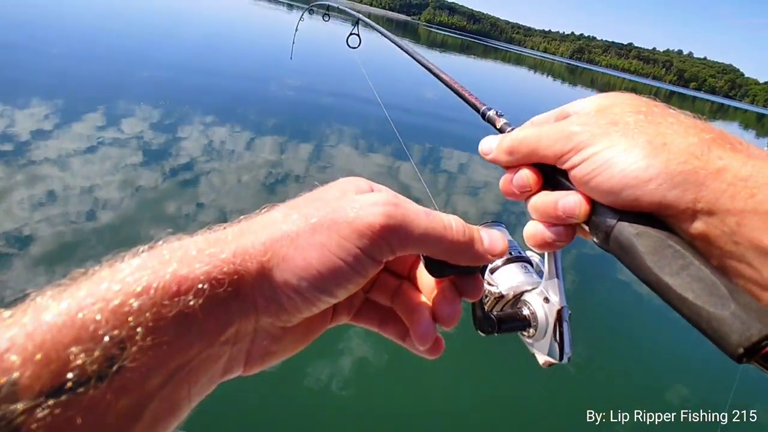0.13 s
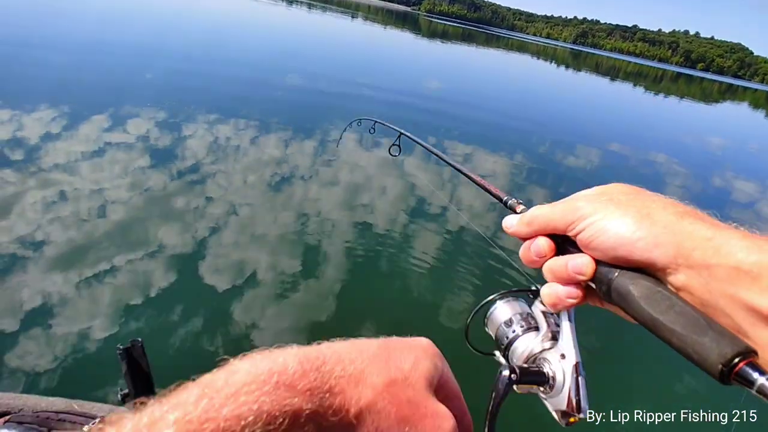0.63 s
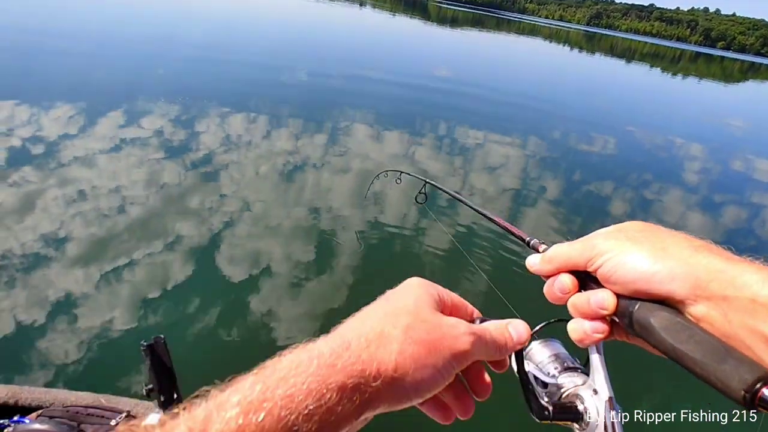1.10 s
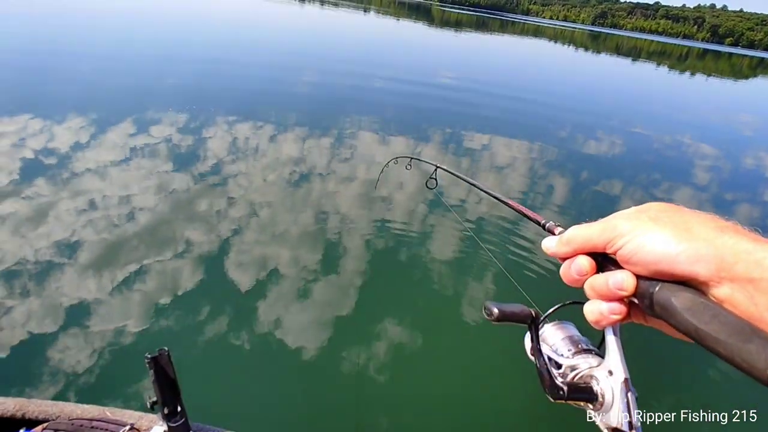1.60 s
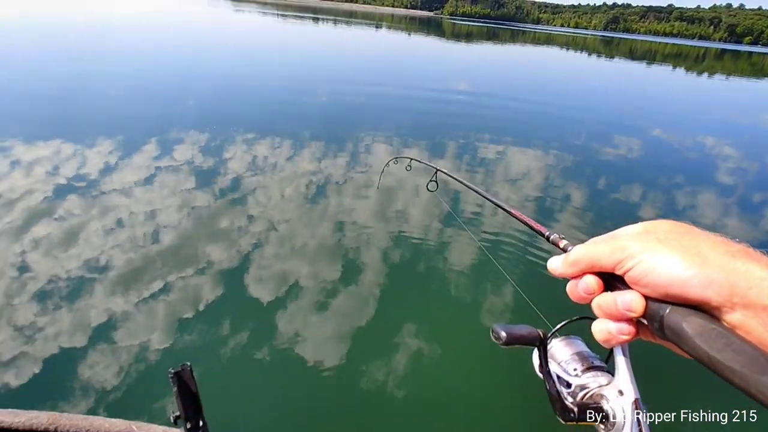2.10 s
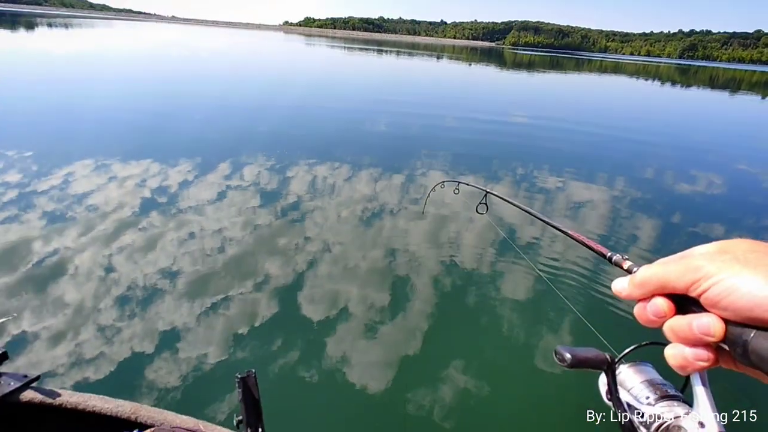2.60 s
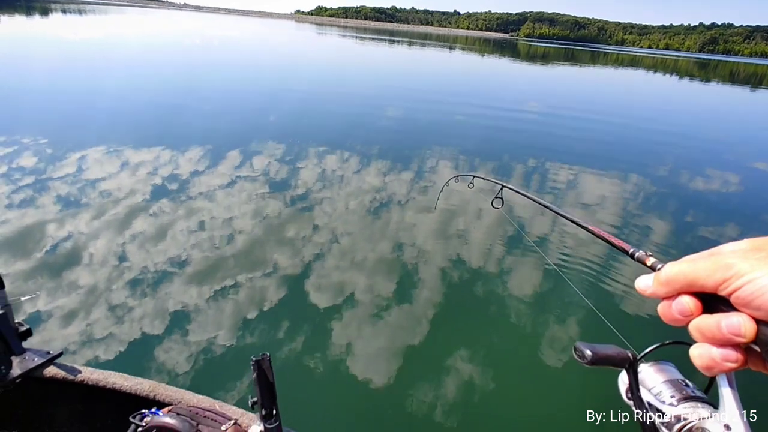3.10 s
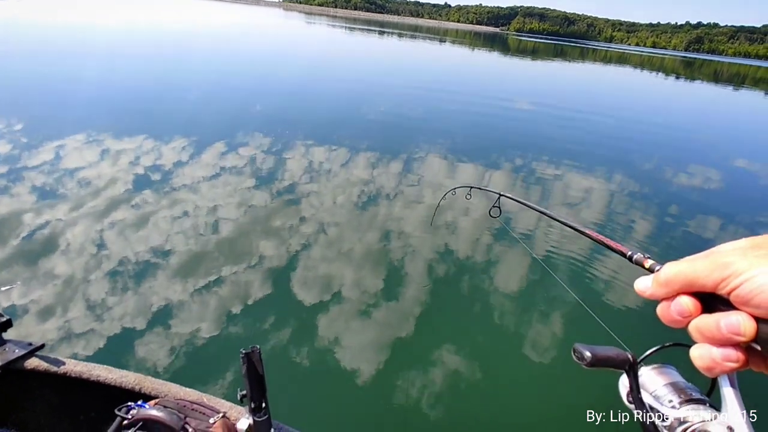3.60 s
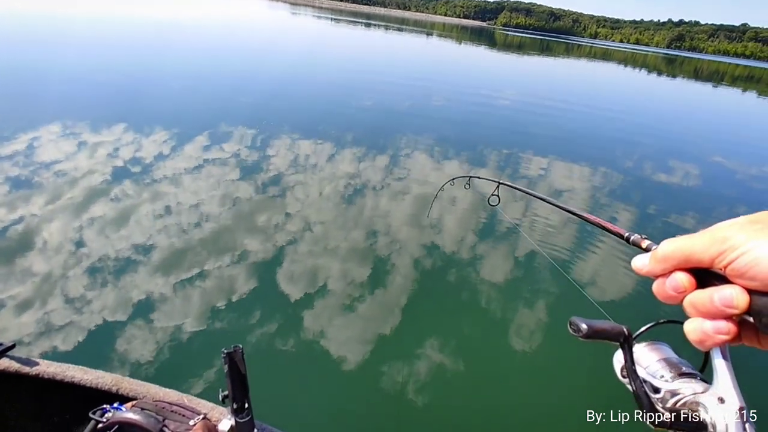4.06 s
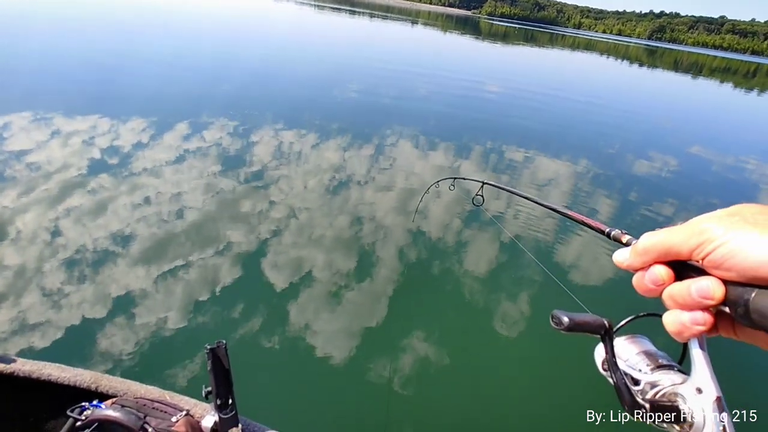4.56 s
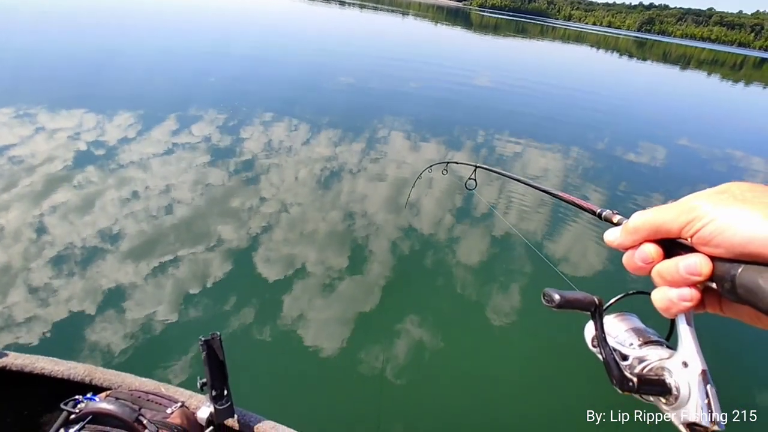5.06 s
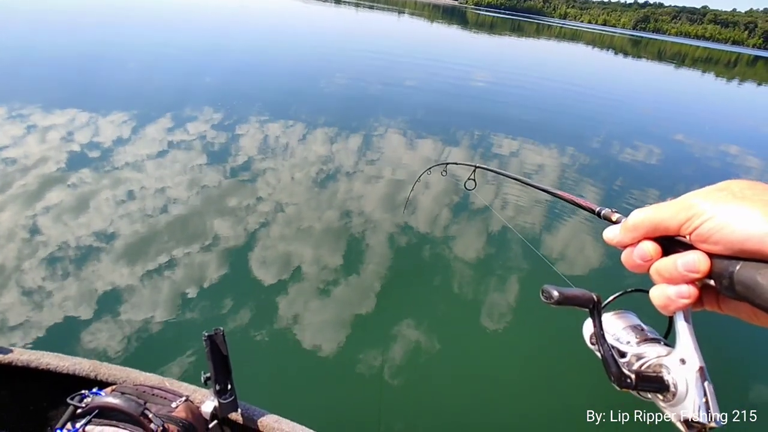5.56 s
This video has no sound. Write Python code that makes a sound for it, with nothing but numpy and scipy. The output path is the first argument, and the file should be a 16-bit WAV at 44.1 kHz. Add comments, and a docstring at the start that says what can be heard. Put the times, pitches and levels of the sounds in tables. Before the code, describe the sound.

Close, stereo outdoor sound on a small boat: a dry, bright reel ratchet dominates, leaning mostly to the right. It begins shortly after the start, rattles quickly, eases to separate clicks around two seconds, then picks up again and varies to the end. Some clicks have a dull low knock and a faint metal ring. Behind are steady quiet ticks, hand and water rustle, lake hush and light wind rumble on the microphone.

```python
"""A small boat on a calm lake: a fish strips line off a spinning reel held close to the microphone.
A sprung pawl snaps over the teeth of the drag: ringing modes, a noisy crack, at times a dull low pulse.
The snaps also make the metal spool ring, and they follow the pull of the fish.
The hull gives soft decaying ticks about thirty times a second; a narrow band of noise swishes briefly.
Behind lie shaped noise for wind, hands and water and the lake's hush, and low puffs at the ports."""
import sys
import numpy as np
from scipy import signal
from scipy.fft import rfft, irfft
from scipy.io import wavfile

SR = 44100
rng = np.random.default_rng(int(sys.argv[2]) if len(sys.argv) > 2 else 0)


def undo_db(level):
    """Turn decibels back into plain size, where 20 dB means ten times bigger."""
    steps = np.asarray(level, float) / 20
    return 10 ** steps


def unload_audio(sound):
    """Save the sound as a 16-bit wav file, at the path given as the first command line argument."""
    columns = np.transpose(np.atleast_2d(sound))
    # keep every value between -1 and 1, then stretch to whole-number steps
    steps = np.round(np.clip(columns, -1, 1) * 32767)
    wavfile.write(sys.argv[1], SR, steps.astype(np.int16))


N = 250488


def rms_one(x):
    """Scale to an rms of 1."""
    return x / np.sqrt(np.mean(x ** 2) + 1e-20)


def sides(pan_db):
    """Gains of the left and right port for a left-right difference in dB; positive is left."""
    return undo_db(np.array([[.5], [-.5]]) * pan_db)


def left_late(x, lag_s):
    """Sound reaches the left port lag_s later than the right."""
    t = np.arange(N)
    return np.array([np.interp(t - lag_s * SR, t, x[0]), x[1]])


def train(s, sizes):
    """Impulses of the given sizes (channels x events) at times s."""
    out = np.zeros((2, N))
    at = np.round(s * SR).astype(int)
    inside = (at >= 0) & (at < N)
    out[:, at[inside]] = sizes[:, inside]
    return out


def ring(clicks, hz, t60):
    """A two-pole resonance struck by clicks; it falls 60 dB in t60 seconds."""
    r = undo_db(-60 / (t60 * SR))
    w = 2 * np.pi * hz / SR
    return signal.lfilter([0, np.sin(w)], [1, -2 * r * np.cos(w), r * r], clicks + 1e-18)


def fade(x, t60):
    """Exponential decay after each impulse, 60 dB in t60 seconds."""
    return signal.lfilter([1], [1, -undo_db(-60 / (t60 * SR))], x + 1e-18)


def swell(s, sizes, rise_t60, fall_t60):
    """An envelope that climbs exponentially to each moment and dies after it."""
    blows = train(s, sizes)
    rise = fade(blows[:, ::-1], rise_t60)[:, ::-1]
    return fade(blows, fall_t60) + rise - blows   # the peak is in both halves


def bell(s, length_s):
    """A smooth rise and fall about time s; length_s is its standard deviation."""
    return np.exp(-.5 * ((np.arange(N) / SR - s) / length_s) ** 2)


def band_pass(x, low_hz, high_hz):
    """Keep one band of frequencies."""
    return signal.sosfilt(signal.butter(2, [low_hz, high_hz], "band", fs=SR, output="sos"), x)


def colour(x, spectrum):
    """Shape by a spectrum in dB per Hz, with the causal (minimum) phase; white noise keeps its rms."""
    size = 1024
    hz, db = np.transpose(spectrum)
    gain = undo_db(np.interp(np.log(np.arange(size + 1) * SR / 2 / size + 1), np.log(hz), db))
    cepstrum = irfft(np.log(gain))
    # folding the cepstrum onto positive time gives minimum phase
    cepstrum[1:size] *= 2
    cepstrum[size + 1:] = 0
    response = irfft(np.exp(rfft(cepstrum)))
    response = response / np.sqrt(np.sum(response ** 2))
    return signal.oaconvolve(x, response[None], axes=1)[:, :N]


def drift(rate_hz):
    """Slow chance for each channel, spread 1: noise through two equal low-pass poles."""
    r = np.exp(-2 * np.pi * rate_hz / SR)
    slow = signal.lfilter([1], [1, -2 * r, r * r], rng.standard_normal((2, N + SR)))
    return rms_one(slow)[:, SR:]


def in_time(rows):
    """Straight lines through the rows' columns, the first being seconds."""
    s, *columns = np.transpose(rows)
    return [np.interp(np.arange(N) / SR, s, c) for c in columns]


def moments(s, counted):
    """Times of every whole count, on a smooth cubic path through the given ones."""
    counted = np.round(counted)
    number = np.arange(counted[0], counted[-1] + 1)
    slope = np.gradient(s, counted)
    i = np.minimum(np.searchsorted(counted, number, "right") - 1, len(s) - 2)
    h = counted[i + 1] - counted[i]
    u = (number - counted[i]) / h
    bend = h * u * (1 - u) * (slope[i] * (1 - u) - slope[i + 1] * u)
    return number.astype(int), s[i] + (s[i + 1] - s[i]) * u * u * (1 + 2 * (1 - u)) + bend


# The drag wheel, tooth by tooth round one turn. Each row: relative levels in dB of the snap, its brightness,
# the reel frame, the reel body and the spool ring near 12 kHz.
WHEEL_TEETH = [(-24, 0.1, -45.5, -40.5, -26), (-23, 0, -48.5, -39, -28), (-24.5, -1.2, -34.5, -42, -23),
               (-25.5, 1, -36, -42.5, -32), (-27.5, 0.2, -36.5, -36.5, -36), (-29, -1.5, -36.5, -34.5, -19),
               (-26.5, -5.5, -33, -33, -36), (-23, -3.5, -32.5, -34.5, -27), (-22, -0.5, -36.0, -33, -29),
               (-21, -1.1, -32, -33.5, -24), (-23, 1, -34, -42.5, -51), (-24.5, -1.3, -37.5, -37.4, -37),
               (-24, 1, -37, -36.5, -58), (-24.5, -0.8, -36, -42.5, -27.2), (-24.5, 1.5, -37.5, -36.0, -27),
               (-25, -1.5, -42, -34, -25), (-25.5, -1, -43, -32.5, -29), (-28, -7, -49, -33.5, -16),
               (-25.5, -3.5, -41, -35.5, -26), (-24.5, -4.5, -44.5, -35, -22),
               (-24, 0.3, -39, -41.5, -30.5), (-24, -1.8, -42, -48.5, -10)]
# How the reel is held. Each row: time in seconds, then load on the pawl, brightness,
# freedom of the frame to shake and left-right difference, all in dB.
REEL_GRIP = [(0, -31, -10, -2, -12), (.3, -3, -5, 13, 1), (0.451, -2, 0, 0, -4.5), (.6, 1.5, -2, 9.5, -1.5),
             (.8, -3, -3.5, -5.5, -9), (1.0, 2.5, -2.5, -8.5, -5), (1.15, 0.5, 2.5, 0, 2),
             (1.5, 0, .5, -0.5, -6.5), (2.2, -1, 4.5, -1, -7.5), (2.8, -2.5, 3, 3, -10.5),
             (3.3, -0.5, 3, 2, -7.5), (3.7, .5, 4, -1.5, -6), (4.1, -0.5, 3, -5, -8.5),
             (4.4, -0.5, 3, -2.5, -7), (4.7, 1, 2.5, 0, -5), (5.05, .5, 4, -8.5, -7),
             (5.35, 1, 2, -4.5, -4.5), (5.68, 2.5, 4, -3, -4.5)]
# Running numbers of the teeth whose passing times are given, one for each row of the next table.
TIMED_TEETH = [-1, 0, 1, 2, 5, 7, 9, 11, 14, 21, 26, 33, 39, 44, 48, 51, *range(53, 57),
               58, 60, *range(62, 82),
               84, 87, 90, 95, 100, 103, 108, 110, 112, 113, 114, 120, 125, 132, 145, 147, 151, 153, 155, 157, 164, 168, 175, 181, 189, 194]
# The pull of the fish. Each row: time in seconds when that tooth passes, relative level of the rim's ring in dB.
LINE_PULL = [(0.0, -46.5), (0.3122, -44), (0.3442, -48), (0.3642, -41), (0.418, -42.5), (0.4616, -47),
             (0.5039, -38.5), (0.557, -39), (0.632, -46), (0.7541, -53), (0.8146, -46), (0.8845, -49),
             (0.9348, -41), (0.98, -45), (1.0158, -44), (1.0471, -48), (1.0795, -45), (1.1085, -46.5),
             (1.151, -68), (1.1968, -58), (1.2791, -48.5), (1.3542, -59), (1.4305, -57), (1.4766, -51),
             (1.5256, -50), (1.5854, -49), (1.6468, -47), (1.726, -50.5), (1.8354, -50.5), (1.9673, -61),
             (2.1246, -57), (2.2461, -46.5), (2.3435, -48), (2.4349, -44), (2.5288, -45), (2.642, -47.5),
             (2.7689, -39.5), (2.9387, -44), (3.1097, -47), (3.2046, -44.5), (3.2554, -52.0), (3.2945, -50),
             (3.391, -48.5), (3.4784, -53), (3.5621, -49), (3.6857, -50.5), (3.7983, -45.5),
             (3.8679, -48.5), (4.0116, -49.5), (4.0852, -45), (4.1551, -50.0), (4.1793, -56), (4.2062, -56),
             (4.3521, -43), (4.45, -46.5), (4.57, -50), (4.8226, -55.5), (4.8641, -56), (4.9668, -44),
             (5.028, -52), (5.088, -44), (5.1375, -54.5), (5.2803, -50), (5.3388, -48), (5.4301, -41),
             (5.5051, -50), (5.6111, -57), (5.6724, -45)]


def snaps():
    """Each click: its time, the levels in dB set by tooth, load and speed, and the gains of the two ports."""
    when, rim_db = np.transpose(LINE_PULL)
    number, s = moments(when, TIMED_TEETH)
    snap_db, bright_db, frame_db, body_db, high_db = np.transpose(WHEEL_TEETH)[:, number % len(WHEEL_TEETH)]
    held, *grip = np.transpose(REEL_GRIP)
    load_db, grip_bright_db, free_db, pan_db = (np.interp(s, held, c) for c in grip)
    octaves = -np.log2(np.gradient(s) * 40)   # speed against 40 clicks per second
    # a faster spool shakes frame, body and ring harder: 3, 1.16 and 6.5 dB per octave
    return {"s": s,
            "snap_db": snap_db + load_db,
            "bright_db": bright_db + grip_bright_db,
            "frame_db": frame_db + free_db + 3 * octaves,
            "body_db": body_db + load_db + 0.7 * free_db + 1.16 * octaves,
            "high_db": high_db + load_db + 6.5 * octaves,
            "rim_db": np.interp(s, when, rim_db),
            "pan": sides(pan_db)}


FRAME_TOP_HZ, BODY_TOP_HZ = 3000, 4500   # modes below these follow the frame, then the body
# Short modes of the reel. Each row: frequency in Hz, relative level in dB, decay by 60 dB in seconds.
REEL_MODES = [(2338, -4, 0.053), (2440, -2, 0.034), (2547, -7.5, 0.051), (2770, -2, 0.025),
              (3500, 7, 0.0086), (4040, -4.5, 0.0041), (4496, -2.5, 0.0044), (5560, -12, 0.022),
              (5920, -17.5, 0.024), (6950, -12.5, 0.019), (7700, -15, 0.008), (9200, -15, 0.029),
              (10540, -9, 0.011), (11620, -5, 0.018), (12300, -8, 0.0098), (13080, -12.5, 0.013),
              (14800, -2.5, 0.0092), (14850, -8.5, 0.0095)]
# Bands whose modes follow the brightness. Each row: lower and upper edge in Hz.
BRIGHT_BANDS = [(5000, 8000), (8000, 11500), (11500, 17000)]


def pawl_modes(clicks):
    """The pawl lands and bounces once; both blows shake every damped mode anew, unevenly."""
    bounce_s, bounce_db, spread_db, smear_s = .0009, -9.5, 4.5, .0001
    modes_db, skew_cycles = -7.5, 0.27   # skew: spread by which the two ports hear a mode out of step
    lift_db, lift_follows = (3.5, 4.5, 2.5), (-1.5, 0.67, 1.42)   # for each bright band
    s = clicks["s"]
    luck = rng.standard_normal((len(s), len(REEL_MODES), 6))
    out = 0
    for k, (hz, db, t60) in enumerate(REEL_MODES):
        lift = sum(base + share * clicks["bright_db"]
                   for base, share, (low, high) in zip(lift_db, lift_follows, BRIGHT_BANDS) if low < hz < high)
        part = "frame_db" if hz < FRAME_TOP_HZ else "body_db" if hz < BODY_TOP_HZ else "snap_db"
        level_db = clicks[part] + db + lift + modes_db
        size = undo_db(level_db + spread_db * luck[:, k, :2].T) * clicks["pan"]   # each port its own way
        landing = train(s + smear_s * luck[:, k, 4], size)
        bounce_size = size * undo_db(bounce_db + spread_db * luck[:, k, 2:4].T)
        bounce = train(s + bounce_s + smear_s * luck[:, k, 5], bounce_size)
        lag_s = skew_cycles * rng.standard_normal() / hz
        out = out + ring(left_late(landing + bounce, lag_s), hz, t60)
    return out


# Broadband part of a snap. Each row: frequency in Hz, relative level in dB per Hz.
CRACK_SPECTRUM = [(2350, -32), (4000, 3), (5610, 6), (8150, 3), (11600, 3), (13100, 4.5), (14700, 3),
                  (16500, 0.5)]


def pawl_noise(clicks):
    """Metal contact as noise: a sharp crack, a mid-band rattle and a faint wash about each snap."""
    s, pan = clicks["s"], clicks["pan"]
    middle_s = s + .00045   # halfway to the bounce
    shared, apart = rng.standard_normal(N), rng.standard_normal((2, N))
    chatter = shared + apart
    blows = undo_db(clicks["snap_db"]) * pan
    crack = undo_db(-4.5) * chatter * swell(middle_s, blows, rise_t60=.0022, fall_t60=0.012)
    wash = undo_db(-28) * apart[::-1] * swell(s, blows, rise_t60=0.061, fall_t60=0.038)
    rattle_size = undo_db(clicks["body_db"] + 3.5) * pan
    rattle = chatter * swell(middle_s, rattle_size, rise_t60=0.0075, fall_t60=0.03)
    return band_pass(rattle, 2000, BODY_TOP_HZ) + colour(crack + wash, CRACK_SPECTRUM)


def pawl():
    """Modes and noise of each snap, high-passed above 1500 Hz."""
    clicks = snaps()
    high_pass = signal.butter(4, 1500, "high", fs=SR, output="sos")
    return signal.sosfilt(high_pass, pawl_modes(clicks) + pawl_noise(clicks))


def spool():
    """Each snap gives the rim's ring a new strength and nudges its phase; overtones add up blow by blow."""
    rim_hz, rise_s, rim_t60, gain_db = 4829, 0.0031, 0.22, 2.5
    spread_db, uneven_db = 6.0, 3.65   # of the overtone blows; of the ring from snap to snap
    clicks = snaps()
    s, pan = clicks["s"], clicks["pan"]
    ring_db = clicks["rim_db"] + uneven_db * rng.standard_normal(len(s))
    t = np.arange(N) / SR
    last = np.maximum(np.searchsorted(s, t, "right") - 1, 0)
    since = np.maximum(t - s[last], 0)
    luck = rng.standard_normal((len(s), 7))
    nudges = np.cumsum(luck[:, 0])   # radians
    phase = 2 * np.pi * rim_hz * t + nudges[last] + [[1.0], [0]]   # left port one radian ahead
    level = undo_db(ring_db[last] + gain_db - 60 * since / rim_t60) * (1 - np.exp(-since / rise_s))
    out = sides(-5.0) * level * np.sin(phase)
    # overtones: Hz, relative dB, t60 in seconds, level of each blow in dB
    overtones = [(7782, -12, 0.32, ring_db), (11815, -15.5, 0.036, clicks["high_db"]),
                 (12900, -8.5, 0.063, ring_db)]
    for k, (hz, db, t60, blow_db) in enumerate(overtones):
        chance_db = spread_db * luck[:, 2 * k + 1:2 * k + 3].T
        out = out + ring(train(s, undo_db(blow_db + db + chance_db) * pan), hz, t60)
    return out


# Snaps that carry a short dull low pulse. Each row: time in seconds, relative level in dB.
LOW_PULSES = [(0.3444, -27.5), (0.3644, -41), (0.5041, -40), (0.5832, -36), (0.6085, -31), (0.7086, -36),
              (0.7805, -34.5), (0.7922, -34.5), (0.8464, -41), (0.8662, -44), (1.0472, -37.2), (1.061, -39),
              (1.1088, -36.5), (1.151, -38), (1.1969, -34.5), (1.2795, -35.5), (1.3541, -40),
              (1.5255, -38.5), (1.5853, -32.5), (1.6467, -31), (1.7262, -32), (1.8357, -33.5),
              (1.9671, -36), (2.2459, -38), (2.4351, -35.5), (2.5287, -35.5), (2.9391, -38.5),
              (3.1109, -36.5), (3.2943, -35.5), (3.3615, -42), (3.4201, -38), (3.4485, -31.1),
              (3.4782, -38.4), (3.507, -44), (3.5348, -33.5), (3.5622, -40), (3.6135, -38), (3.7077, -40),
              (3.7304, -41), (3.776, -40.5), (3.9786, -40), (4.1548, -40.5), (4.1797, -37), (4.2069, -38.5),
              (4.2823, -33), (4.3063, -40), (4.3524, -38), (4.3933, -40), (4.5361, -41), (4.5529, -34.5),
              (4.7223, -35), (4.7416, -27.5), (4.7814, -39), (4.8642, -42), (5.2261, -34), (5.2634, -38),
              (5.3108, -40), (5.4304, -42), (5.5317, -34.5), (5.5452, -33), (5.5851, -33), (5.5984, -41),
              (5.6112, -42)]


def low_pulse():
    """Some snaps carry a short dull low pulse, slightly late: a band-passed impulse of either sign."""
    clicks = snaps()
    when, db = np.transpose(LOW_PULSES)
    nearest = abs(when[:, None] - clicks["s"]).argmin(axis=1)
    size = undo_db(db + 24) * clicks["pan"][:, nearest] * rng.choice([-1, 1], len(when))
    late_s = .0006
    pulse = train(clicks["s"][nearest] + late_s, size)
    return band_pass(pulse + 1e-18, 180, 2400)


# A brief hoarse swish, perhaps line rubbing in the guides. Each row: centre in seconds,
# length (standard deviation) in seconds, level in dB at the peak.
LINE_SWISHES = [(.08, 0.034, -53), (.93, 0.077, -59), (5.605, 0.047, -54)]


def swishes():
    """Noise in a narrow band, swelling and fading."""
    centre_hz, width_hz = 1610, 140
    level = sum(undo_db(db) * bell(s, length_s) for s, length_s, db in LINE_SWISHES)
    hoarse = band_pass(rng.standard_normal((2, N)), centre_hz - width_hz / 2, centre_hz + width_hz / 2)
    return level * rms_one(hoarse)


# The ticking runs a little fast and slow by turns. Each row: time in seconds, ticks counted so far.
HULL_TIMES = [(0.026, 0), (0.4935, 14), (1.0758, 32), (1.2755, 38), (1.5079, 45), (1.6761, 50),
              (1.9358, 58), (2.1334, 64), (2.3274, 70), (2.6523, 80), (2.94, 89), (3.337, 101),
              (3.6558, 111), (4.0234, 122), (4.284, 130), (4.9153, 149), (5.236, 159), (5.6532, 172)]
# What a tick rings with. Each row: frequency in Hz, relative level in dB, decay by 60 dB in seconds,
# left-right difference in dB.
HULL_MODES = [(309, -20.5, 0.049, -2.6), (931.5, -20, 0.03, -9), (1046, -11.5, 0.027, -9.5),
              (1207, -17, 0.023, -11.5), (1950, -14.5, 0.0078, 9.5), (2650, -15, 0.0055, -2.2),
              (4080, -12.5, 0.0039, -6.5)]


def hull_tick():
    """A soft double tick, the weak one first; its modes swell in a few cycles and die in the hull."""
    first_s, first_db, spread_db = .008, -12.0, 1.4
    _, when = moments(*np.transpose(HULL_TIMES))
    level = undo_db(-39.5 + spread_db * rng.standard_normal(len(when))) * np.ones((2, 1))
    ticks = train(when, level) + undo_db(first_db) * train(when - first_s, level)
    t, shape = np.arange(-SR // 20, SR // 20) / SR, 0
    for k, (hz, db, t60, pan_db) in enumerate(HULL_MODES):
        age = t + first_s * (k == 0)   # the lowest mode peaks early, with the weak tick
        rise_s = 1.3 / hz   # each mode swells in so many cycles
        rise = np.exp(-.5 * (age / rise_s) ** 2)
        fall = undo_db(-60 * (np.hypot(age, rise_s) - rise_s) / t60)
        tone = np.where(age < 0, rise, fall) * np.cos(2 * np.pi * hz * age)
        shape = shape + sides(pan_db) * undo_db(db - abs(pan_db) / 2) * tone
    return signal.oaconvolve(ticks, 2 * shape, axes=1)[:, SR // 20:SR // 20 + N]


def half_alike():
    """White noise in both ports with a part in common."""
    return rng.standard_normal((2, N)) + 0.64 * rng.standard_normal((1, N))


# Hands and water close by. Each row: frequency in Hz, relative level in dB per Hz.
RUSTLE_SPECTRUM = [(150, -20), (300, -0.5), (500, 4), (800, -7.5), (1500, -3.5), (2000, -1), (2600, -14.5),
                   (8000, -70)]


def rustle(level_db):
    """Hands and water: coloured noise, its grainy level shared by both ports."""
    return colour(half_alike(), RUSTLE_SPECTRUM) * undo_db(level_db + 2.0 + 3.5 * drift(60)[0])


# Wind at the microphone ports. Each row: frequency in Hz, relative level in dB per Hz.
WIND_SPECTRUM = [(12, -32), (20, -8.5), (70, 2), (124, -7), (157, -23), (188, -16), (260, -19.5),
                 (340, -20), (570, -120)]


def wind(level_db, pan_db):
    """Light wind buffets the ports: low separate noise in each, with lumpy levels."""
    gusts = sides(pan_db) * undo_db(level_db + 5.0 + 4.5 * drift(15.3))
    return gusts * colour(rng.standard_normal((2, N)), WIND_SPECTRUM)


# The open lake all round. Each row: frequency in Hz, relative level in dB per Hz.
LAKE_SPECTRUM = [(88, -59), (150, 18.5), (222, 1), (309, 5), (689, 1), (1060, -6), (1360, -9), (1940, -6),
                 (3420, -8), (4760, -14), (6510, -15), (14800, -16.5), (16000, 0)]


def lake():
    """The even hush of the lake: steady coloured noise."""
    return undo_db(-62) * colour(half_alike(), LAKE_SPECTRUM)


# The air about the boat. Each row: time in seconds, relative level of wind on the ports in dB, its left-right
# difference in dB, relative level of the rustle of hands and water in dB.
AIR_LEVELS = [(0.0, -65, 1.0, -59), (0.05, -62.5, 1, -60), (0.85, -68.5, -3, -71.5),
              (1.36, -65, -4.5, -66.5), (2.53, -59, 1, -70.5), (3.37, -63.5, 2, -68),
              (3.48, -53.5, 13, -63), (3.62, -70.5, -2.0, -69.5), (4.13, -57, -6, -69), (4.21, -62, 5, -74),
              (4.54, -66, 2, -71), (4.62, -59, 13.5, -69), (4.79, -67, -4, -71), (4.9, -57, 12.5, -68),
              (5.03, -50.5, -4, -67.5), (5.28, -58, -6, -79), (5.35, -64.5, 14, -75), (5.68, -63, 12, -77)]


def air():
    """Wind and rustle following their moving levels, with the steady hush of the lake."""
    wind_db, wind_pan_db, rustle_db = in_time(AIR_LEVELS)
    return wind(wind_db, wind_pan_db) + sides(-2.0) * (rustle(rustle_db) + lake())


# Puffs of wind that thump the right port. Each row: time in seconds, frequency in Hz, level in dB,
# length (standard deviation) in seconds, left-right difference in dB.
WIND_PUFFS = [(5.053, 56, -38.5, 0.013, -21), (5.129, 133, -34.5, 0.0034, -22)]


def puffs():
    """A cycle or two of low pressure: a sine under a bell-shaped envelope."""
    t = np.arange(N) / SR
    return sum(sides(pan_db) * undo_db(db) * bell(s, length_s) * np.sin(2 * np.pi * hz * (s - t))
               for s, hz, db, length_s, pan_db in WIND_PUFFS)


def scene():
    """The reel close on the right, the hull below, the air around."""
    # the left port is further away from reel and hull
    reel = left_late(pawl() + low_pulse() + spool(), 0.0002032)
    hull = left_late(hull_tick(), 0.00016)
    return reel + swishes() + hull + air() + puffs()


def roll_off(x):
    """The treble ends steeply here."""
    return signal.sosfilt(signal.butter(12, 16640, fs=SR, output="sos"), x)


def record(dry):
    """A steep low-pass takes off the top of the finished mix, from 16400 Hz up."""
    low_pass = signal.cheby2(12, 60, 16400, fs=SR, output="sos")
    mix = signal.sosfilt(low_pass, dry)
    return roll_off(mix)


dry = scene()
out = record(dry)
unload_audio(out)
```